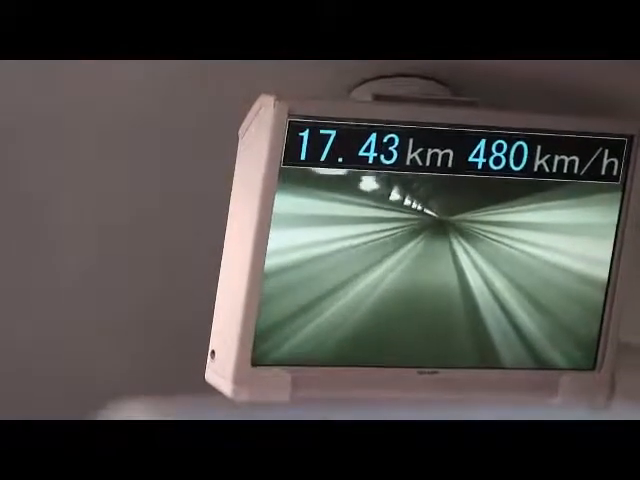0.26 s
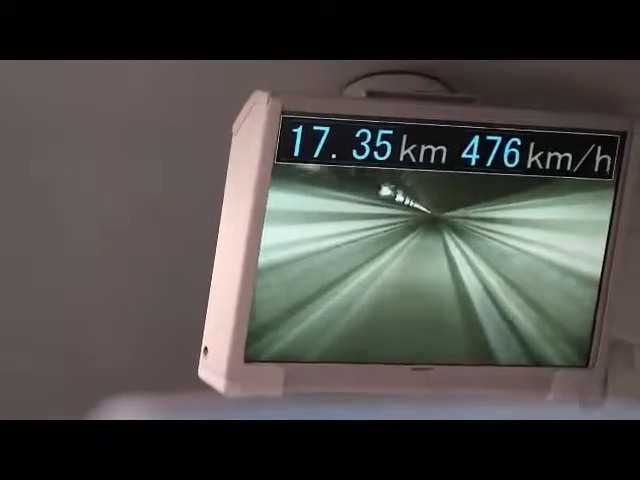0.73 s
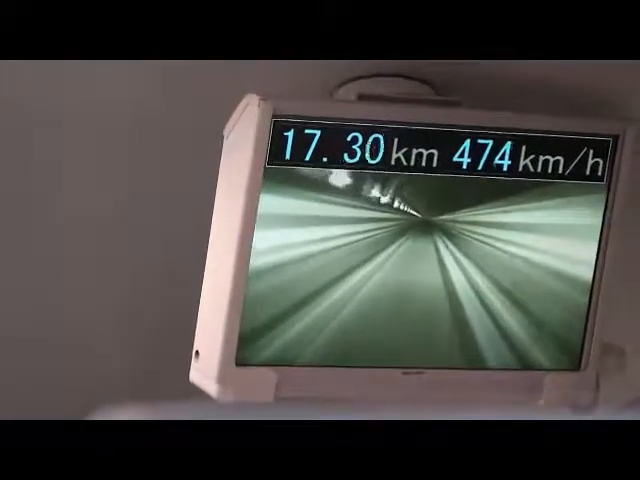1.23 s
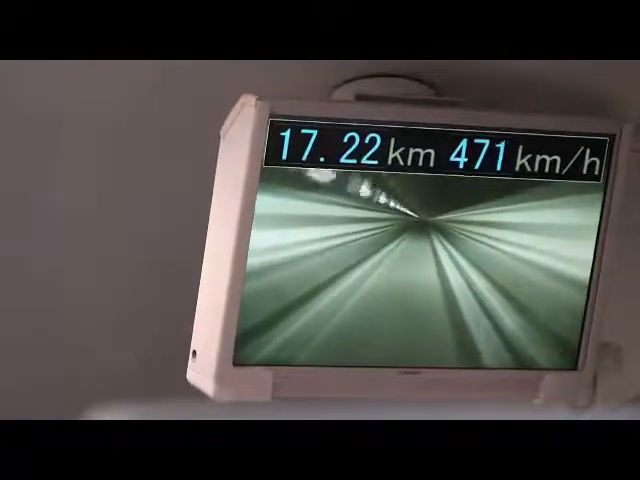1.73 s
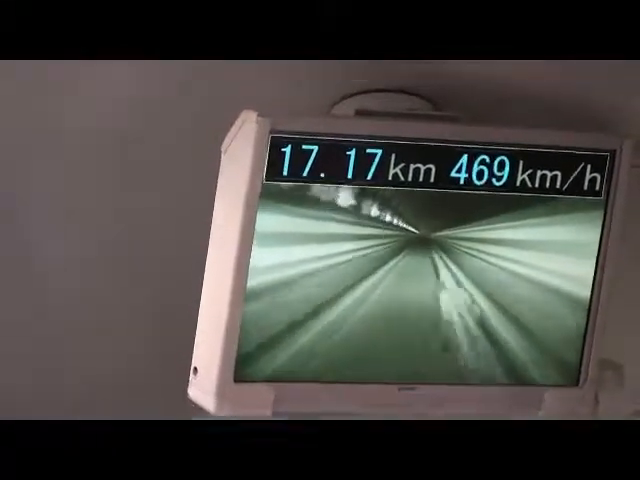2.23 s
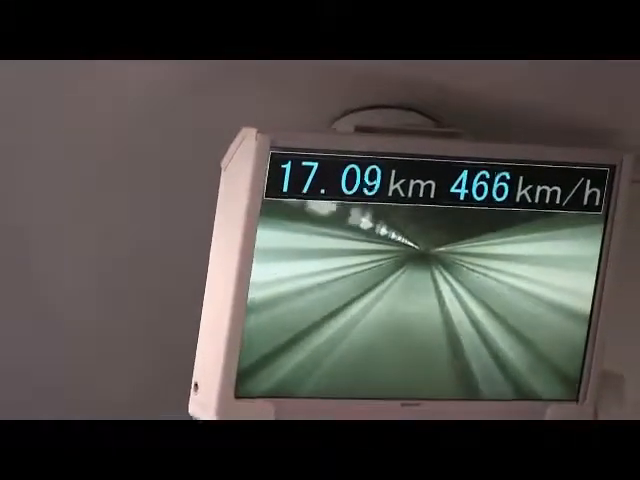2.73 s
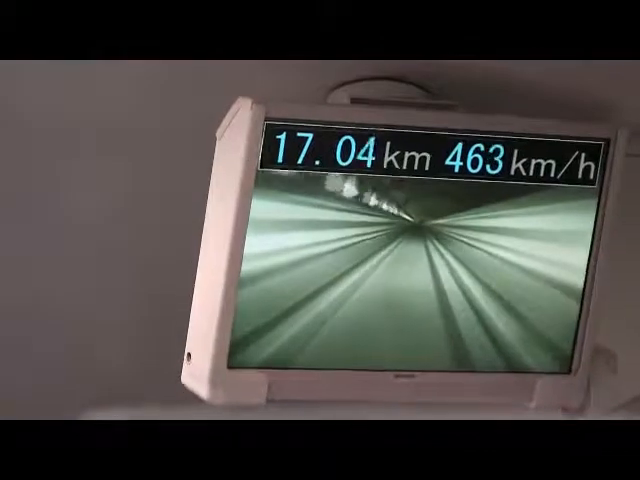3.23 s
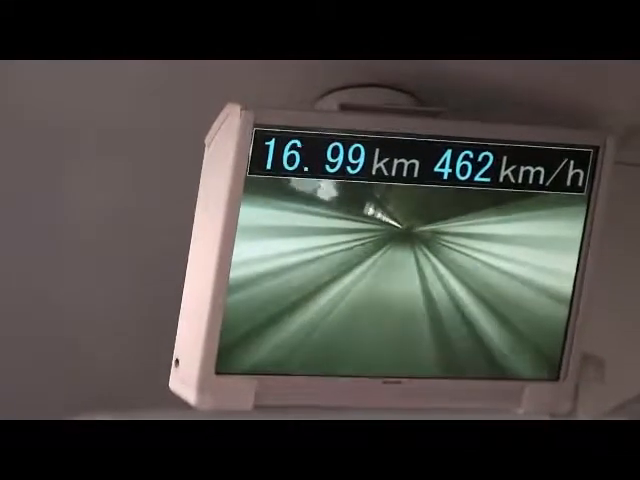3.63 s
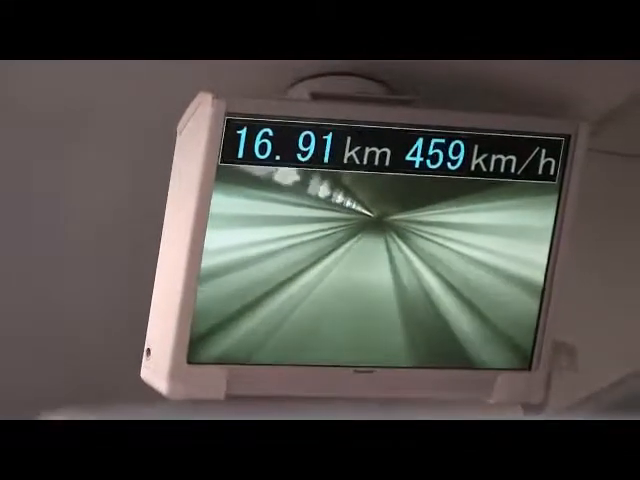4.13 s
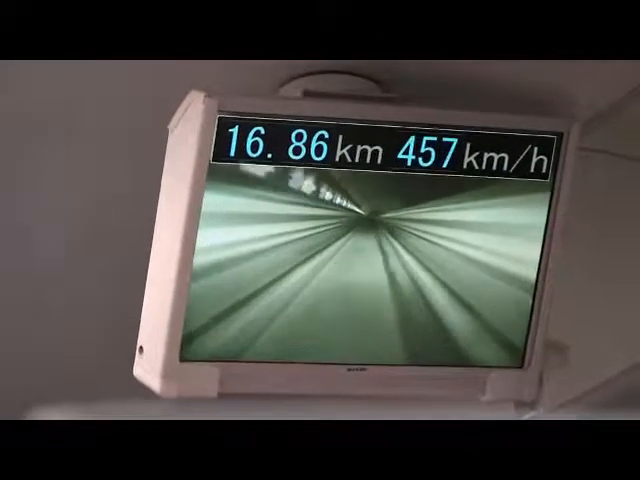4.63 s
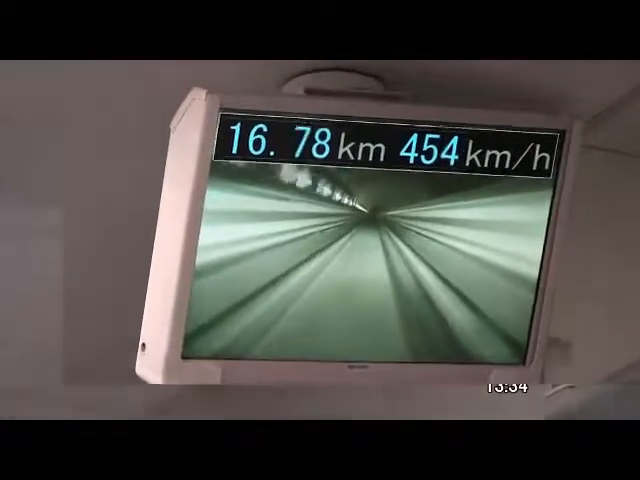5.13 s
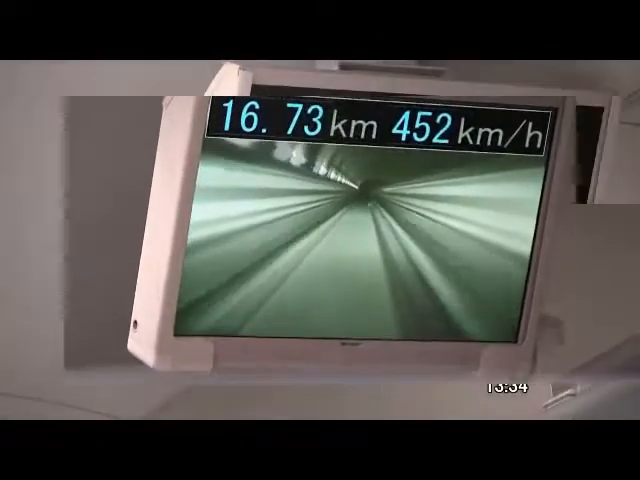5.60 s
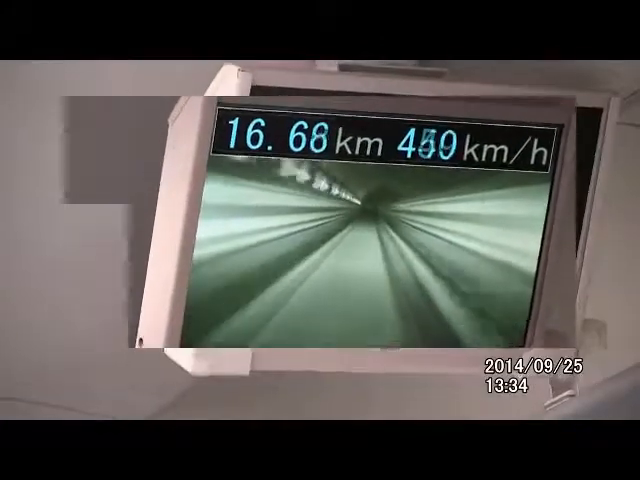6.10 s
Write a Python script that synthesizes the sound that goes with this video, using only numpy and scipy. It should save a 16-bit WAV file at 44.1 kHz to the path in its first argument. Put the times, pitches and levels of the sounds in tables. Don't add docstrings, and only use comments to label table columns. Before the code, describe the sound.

Loud, deep airflow boom fills a high-speed train cabin, with a low hum slowly sinking in pitch and two sharp, dry clicks.

```python
import sys
import numpy as np
from scipy import signal
from scipy.fft import rfft, irfft, next_fast_len
from scipy.io import wavfile
from scipy.ndimage import uniform_filter1d

SR = 44100
rng = np.random.default_rng(int(sys.argv[2]) if len(sys.argv) > 2 else 0)


def wav_out(sig):
    wavfile.write(sys.argv[1], SR, np.round(np.clip(np.atleast_2d(sig).T, -1, 1) * 32767).astype(np.int16))


def makeup_ratio(level_db):
    decades = np.asarray(level_db, float) / 20
    return 10 ** decades


N = 280331

# [t/s, level/dB]
BOOM = [(0, -12.5), (.8, -10), (1.5, -12.3), (2.0, -11.8), (2.5, -13.5), (3.0, -12), (4.0, -11),
        (5.0, -13.5), (6.36, -16)]
# [f/Hz, density/dB per Hz]
CABIN_COLOUR = [(20, -26), (45, -15.5), (70, -9.5), (100, -1.5), (125, 2), (160, -3), (220, -13.5),
                (300, -17), (380, -24.5), (570, -29), (730, -34), (1480, -47), (2500, -58.5), (5000, -91)]
# [f/Hz, likeness/0-1, left minus right/dB]
MICROPHONES = [(25, 0.97, -1.8), (45, .94, -1.3), (80, .98, 1.4), (150, 0.99, 2.5), (300, 0.8, 3),
               (586, .82, -3.7), (1090, .66, -2), (2500, 0.2, -4)]
# [t/s, level/dB, left minus right/dB, left lead/rad]
COIL_HUM = [(0.0, -26, 11, -.1), (0.7, -25, 7.5, .15), (1.1, -21, 5, .25), (1.7, -19, 5, 0.02),
            (2.6, -19.5, 6, -.25), (3.4, -20.5, 7.5, -.45), (4.3, -21, 12, -.2), (5.0, -22.5, 10.5, -.2),
            (5.7, -25, 12, .3), (6.36, -29, 11, .6)]
# [order/1, left level/dB, right level/dB]
COIL_PATTERN = [(1, -37, -35), (3, -35.5, -41.5), (6, -44, -45), (7, -56, -50), (8, -47.5, -48.5),
                (10, -62.5, -63.5)]
# [start/s, length/ms, level/dB, bright edge/dB]
STROKES = [(0.025, 55, -45, -43.5), (0.095, 130, -51, -31), (0.425, 145, -51, -35), (0.59, 70, -47, -30),
           (0.715, 105, -44, -34), (0.864, 48, -47.5, -46), (1.07, 72, -54, -34), (1.598, 44, -51.5, -6),
           (1.625, 60, -48.5, -26), (1.921, 125, -48.5, -13.5), (1.955, 50, -46.5, -10),
           (2.412, 30, -39, -12), (2.457, 40, -55, -31), (2.57, 35, -55.5, -38), (2.924, 43, -54, -40),
           (3.05, 79, -52, -20), (3.93, 55, -51, -7), (3.97, 60, -51, -33), (4.576, 45, -53, -42),
           (5.03, 82, -49.5, -45), (5.121, 40, -54.5, -11), (5.285, 75, -51.5, -8.5), (5.441, 91, -54, -44),
           (5.6, 50, -54, -19), (5.698, 62, -55.5, -14), (5.81, 70, -51.5, -13), (5.88, 100, -57, -30),
           (6.08, 61, -51, -19), (6.185, 60, -51, -44), (6.272, 70, -54.5, -9.5)]
# [t/s, left jump/dB, right jump/dB, settling/ms, top f/Hz]
JUMPS = [
    (0.8311, -7, -4, .9, 10390),
    (3.73247, -42, -15, .5, 3500),
    (3.7752, -4.5, -3.5, 0.92, 10400),
]
# [f/Hz, t60/s, level/dB]
CASE_MODES = [(2080, .02, -6), (3500, 0.012, 2), (4270, .02, -9), (5860, .02, -11)]
# [f at rest/Hz, sag share/1, level/dB]
STRAP_PARTIALS = [(3600, .02, -65), (4080, .09, -65), (5600, .26, -60), (8700, .005, -72)]
# [f/Hz, step/dB]
ROUNDING_STEPS = [(500, -53), (1200, -46), (2000, -36.5), (2800, -36), (4500, -36), (9000, -37)]

SPEED_M_S, BRAKING_M_S2 = 133.0, 1.42
TIME_S = np.arange(N) / SR
LEFT_RIGHT = np.array([[1], [-1]])


def curve(table):
    s, *columns = np.transpose(table)
    return [np.interp(TIME_S, s, c) for c in columns]


def walk(rate_hz):
    k = int(SR / rate_hz)
    held = np.repeat(rng.standard_normal(N // k + 1), k)
    return 1.3 * uniform_filter1d(uniform_filter1d(held, k), k)[:N]


def on_log_axis(hz, table, column):
    table = np.array(table)
    return np.interp(np.log(hz), np.log(table[:, 0]), table[:, column])


def band(x, lo_hz, hi_hz):
    y = signal.sosfilt(signal.butter(3, [lo_hz, hi_hz], "bandpass", fs=SR, output="sos"), x)
    return y / y.std()


def ring(start_s, hz, t60_s):
    t = np.maximum(TIME_S - start_s, 0)
    return np.sin(2 * np.pi * hz * t) * 1000 ** (-t / t60_s)


def onset(start_s, rise_s):
    return 1 - np.exp(-np.maximum(TIME_S - start_s, 0) / rise_s)


def airflow():
    boom_db, = curve(BOOM)
    rush_abs_db = -10.5 - 0.4427 * BRAKING_M_S2 * TIME_S + 0.3 * (boom_db - boom_db[0])
    rush_db = rush_abs_db - boom_db
    size = next_fast_len(N)
    hz = np.maximum(np.fft.rfftfreq(size, 1 / SR), 1)

    likeness = on_log_axis(hz, MICROPHONES, 1)
    mid, side = rfft(rng.standard_normal((2, size)))
    mics = np.sqrt(1 + likeness) * mid + np.sqrt(1 - likeness) * side * LEFT_RIGHT
    balance_db = on_log_axis(hz, MICROPHONES, 2) / 2 * LEFT_RIGHT
    mics = mics * makeup_ratio(on_log_axis(hz, CABIN_COLOUR, 1) + balance_db)
    mics = mics * (hz > 12) / irfft(mics, size).std()

    swell_db = 0.27 * walk(2.0)
    seal_hiss_db = 2.1 * walk(15)
    out = np.zeros((2, N))
    for octave in range(4, 14):
        share = np.cos(np.clip(np.log2(hz) - octave, -1, 1) * np.pi / 2) ** 2
        rush = np.clip(octave - 8, 0, 1)
        db = boom_db + rush * rush_db + swell_db + rush * 0.88 * walk(8.3)
        db = db + seal_hiss_db * (octave > 10)
        out += makeup_ratio(db) * irfft(mics * share, size)[:, :N]
    return out


def coils():
    coil_spacing_m, waver_db, fade_db = 0.45, 1.5, 2.0
    level_db, pan_db, lead_rad = curve(COIL_HUM)
    hz = (SPEED_M_S - BRAKING_M_S2 * TIME_S) / coil_spacing_m
    phase = 2 * np.pi * np.cumsum(hz) / SR
    level_db = level_db + LEFT_RIGHT / 2 * pan_db + waver_db * walk(6)
    out = makeup_ratio(level_db) * np.sin(phase + LEFT_RIGHT / 2 * lead_rad)
    for order, *db in COIL_PATTERN:
        tone = np.sin(phase * order / 4 + 2 * np.pi * rng.random())
        out += makeup_ratio(np.array(db))[:, None] * makeup_ratio(fade_db * walk(1.3)) * tone
    return np.sqrt(2) * out


def rustles():
    trim_db, edge_db, edge_hz, spread = -4.0, 7.5, 5800, 1.5
    out = np.zeros((2, N))
    for s, length_ms, level_db, bright_db in STROKES:
        i = np.arange(int(s * SR), min(int((s + length_ms / 1000) * SR), N))
        dull, thin = rng.standard_normal((2, 2, 8192))
        body = band(dull, 1900, 4100)
        edge = makeup_ratio(bright_db + edge_db) * band(thin, edge_hz / spread, edge_hz * spread)
        stroke = (body + edge)[:, :len(i)] * np.sin(np.linspace(0, np.pi, len(i))) ** 0.6
        pan_db = -3.0 + 0.4 * (level_db + 46)
        out[:, i] += makeup_ratio(level_db + trim_db + LEFT_RIGHT * pan_db / 2) * stroke
    return out


def thud():
    start_s = 0.622
    return makeup_ratio(-41) * ring(start_s, 1900, 0.09) * onset(start_s, 0.006)


def skips():
    right_top_hz = 8900
    out = np.zeros((2, N))
    for s, left_db, right_db, settle_ms, top_hz in JUMPS:
        i = int(s * SR) + np.arange(-800, 800)
        t = i / SR - s
        step = np.sign(t) / 2 * np.exp(-np.abs(t) * 1000 / settle_ms)
        sides = [(left_db, top_hz), (right_db, min(top_hz, right_top_hz))]
        for side, (db, hz) in enumerate(sides):
            out[side, i] += makeup_ratio(db) * np.convolve(step, signal.firwin(201, hz, fs=SR), "same")
    return out


def tick():
    start_s, level_db, pan_db = 2.4168, -27, -5.5
    modes = sum(makeup_ratio(db) * ring(start_s, hz, t60_s) for hz, t60_s, db in CASE_MODES)
    return makeup_ratio(level_db + LEFT_RIGHT * pan_db / 2) * modes * onset(start_s, 0.00027)


def panel():
    peak_s, peak_db, rise_db_s, fall_db_s = 5.5, -63, 8.0, 22.5
    late_s = TIME_S - peak_s
    db = peak_db + np.minimum(rise_db_s * late_s, -fall_db_s * late_s)
    hz = 2436 * (1 + 0.006 * walk(12))
    return makeup_ratio(db + 2.5 * walk(18)) * np.sin(2 * np.pi * np.cumsum(hz) / SR)


def squeak():
    start_s, length_s, sag_s = 5.81, 0.175, 0.065
    t = TIME_S - start_s
    hold = np.sin(np.pi * np.clip(t / length_s, 0, 1) ** 0.6) ** 0.4
    sag_curve = np.exp(-np.maximum(t, 0) / sag_s)
    out = np.zeros(N)
    for hz, sag, db in STRAP_PARTIALS:
        pitch_hz = hz * (1 + sag * sag_curve + 0.018 * walk(60))
        out += makeup_ratio(db + 5.0 * walk(40)) * np.sin(2 * np.pi * np.cumsum(pitch_hz) / SR)
    return hold * out


def overload(x):
    return np.tanh(0.9 * x) / 0.9


def coarse_rounding(x):
    hop, grid = 944, 527
    frame_db, patch_db, round_up = 1.8, 3.5, 0.33
    n, k = np.arange(2 * hop)[:, None] + 0.5, np.arange(hop) + 0.5
    window = np.sqrt(2 / hop) * np.sin(np.pi * n / (2 * hop))
    basis = window * np.cos(np.pi / hop * (n + hop / 2) * k)
    count, front = N // hop + 3, 2 * hop - grid
    pair = np.array([[1, 1], [1, -1.005]]) / np.sqrt(2)
    back = count * hop - front - N + hop
    halves = np.pad(pair @ x, ((0, 0), (front, back)), "reflect").reshape(2, count + 1, hop)
    lines = halves[:, :-1] @ basis[:hop] + halves[:, 1:] @ basis[hop:]

    patches = np.repeat(rng.standard_normal((2, count, hop // 16)), 16, axis=2)
    wobble_db = frame_db * rng.standard_normal((count, 1)) + patch_db * patches
    centre = np.clip(np.arange(count) * hop + hop - front, 0, N - 1)
    boom_db = curve(BOOM)[0][centre, None]
    step_db = on_log_axis(k * SR / 2 / hop, ROUNDING_STEPS, 1)
    step = makeup_ratio(step_db + wobble_db + boom_db - boom_db.mean())
    lines = np.sign(lines) * np.floor(np.abs(lines) / step + round_up) * step

    out = np.zeros_like(halves)
    out[:, :-1] += lines @ basis[:hop].T
    out[:, 1:] += lines @ basis[hop:].T
    return pair @ out.reshape(2, -1)[:, front:front + N]


def scene():
    return airflow() + coils() + rustles() + thud() + tick() + panel() + squeak()


def roll_off(x):
    return signal.sosfilt(signal.butter(12, 10340, fs=SR, output="sos"), x)


def record(dry):
    camera = coarse_rounding(overload(dry))
    return roll_off(camera + skips())


dry = scene()
out = record(dry)
wav_out(out)
```